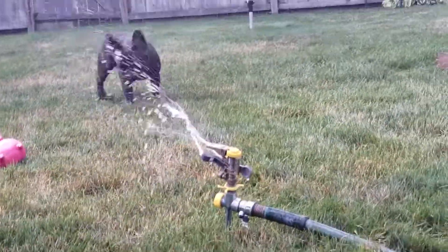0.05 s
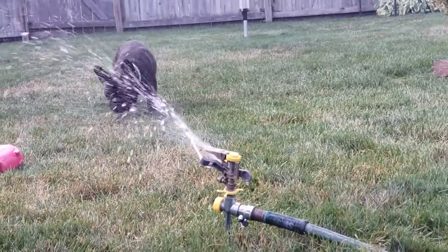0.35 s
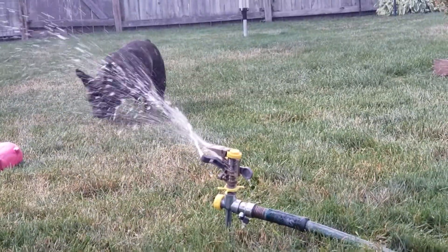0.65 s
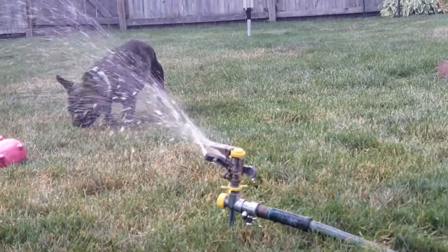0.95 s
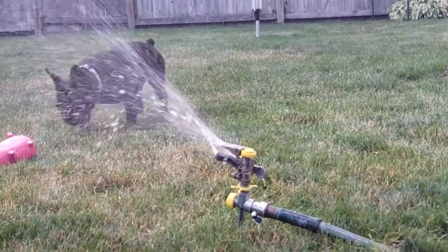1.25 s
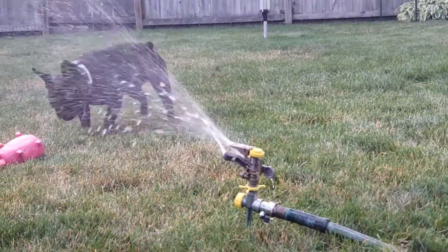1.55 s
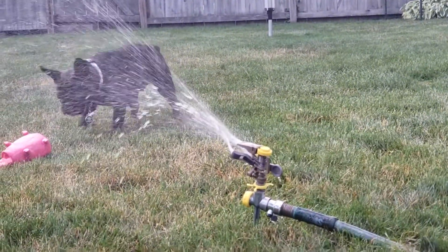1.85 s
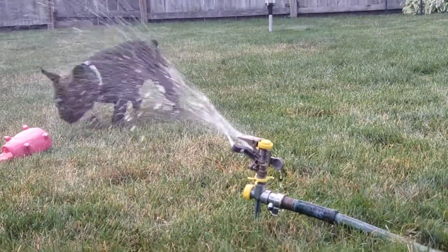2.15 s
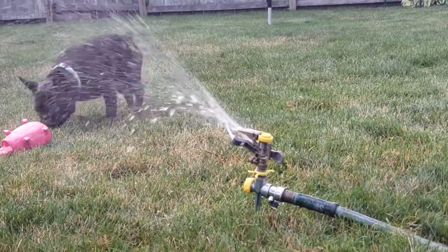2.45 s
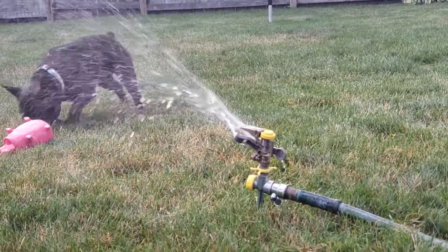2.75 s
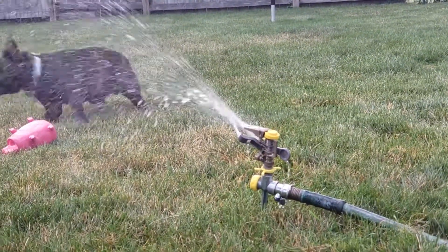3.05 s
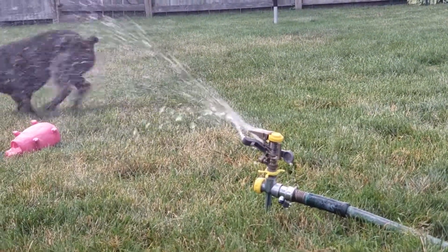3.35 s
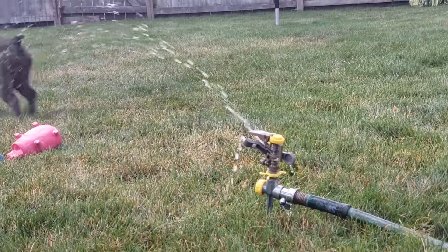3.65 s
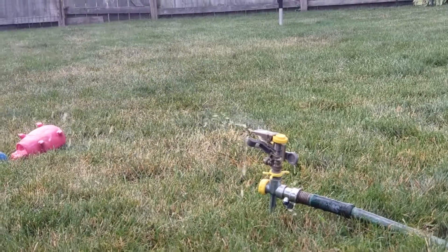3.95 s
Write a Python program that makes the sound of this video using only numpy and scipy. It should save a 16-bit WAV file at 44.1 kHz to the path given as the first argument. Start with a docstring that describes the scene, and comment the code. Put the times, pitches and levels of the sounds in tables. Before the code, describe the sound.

A lawn sprinkler hisses steadily, then clicks and splutters as the water dies away.

```python
"""Impact sprinkler on a lawn.

Close to a pair of microphones, the jet hisses steadily, drums on a dog's coat and rings in its muzzle.
After three seconds the spring arm starts to swing: it slaps through the jet, scatters drops and knocks
on the metal head, ever weaker as the water pressure dies. A low outdoor rumble lies underneath."""
import sys
import numpy as np
from scipy.fft import rfft, irfft, next_fast_len
from scipy.io import wavfile

SR = 44100
rng = np.random.default_rng(int(sys.argv[2]) if len(sys.argv) > 2 else 0)


def dump_mix(stems):
    """Bounce the given channels to the path in sys.argv[1] as a 16-bit WAV at rate SR."""
    frames = np.atleast_2d(stems).T  # one column per channel
    limited = np.clip(frames, -1, 1)  # hard clip at full scale
    pcm = np.round(limited * 32767).astype(np.int16)
    wavfile.write(sys.argv[1], SR, pcm)


N = 176400
T = np.arange(N) / SR
FFT_SIZE = next_fast_len(N + 8192, real=True)
HZ = np.fft.rfftfreq(FFT_SIZE, 1 / SR)


def amp(db):
    return np.exp(np.asarray(db) * (np.log(10) / 20))


def unit_rms(x):
    return x / np.sqrt(np.mean(x ** 2) + 1e-20)


def over_hz(points, hz=HZ):
    """Interpolate (Hz, value) points on a log frequency axis."""
    freqs, values = np.transpose(points)
    return np.interp(np.log(hz + 1), np.log(freqs + 1), values)


def over_time(rows):
    """One per-sample curve for each column after the time."""
    times, *columns = np.transpose(rows)
    return [np.interp(T, times, column) for column in columns]


def wobble(knots_per_s):
    """Random curve of rms near 1."""
    count = int(N * knots_per_s / SR) + 2
    return 1.2 * np.interp(T * knots_per_s, np.arange(count), rng.standard_normal(count))


def peak(centre_hz, half_width_hz, hz=HZ, power=2):
    return 1 / (1 + np.abs((hz - centre_hz) / half_width_hz) ** power)


def filtered(x, response):
    return irfft(rfft(x, FFT_SIZE) * response, FFT_SIZE)[..., :N]


def noise(colour, coherence):
    """Coloured stereo noise of rms 1 whose sides are partly alike."""
    angle = np.arccos(np.clip(coherence, -1, 1)) / 2
    mid, side = rng.standard_normal((2, 2 * len(HZ))).view(complex)
    mid, side = mid * np.cos(angle), side * np.sin(angle)
    return unit_rms(irfft(colour * np.array([mid + side, mid - side]), FFT_SIZE)[:, :N])


def lead_left(x, phase_rad=0, lead_ms=0):
    """The sound reaches the left microphone first, by a phase plus a time."""
    lead_rad = phase_rad + 2 * np.pi * HZ * lead_ms * 1e-3
    return filtered(x, np.exp(np.outer([0.5j, -0.5j], lead_rad)))


def blow(t60_s, attack_s=0.00033, hold_s=0.00036):
    """Impact envelope: quick rise, brief hold, decay."""
    t = T[:SR // 10]
    return (1 - np.exp(-t / attack_s)) * np.exp(-np.log(1000) * np.maximum(t - hold_s, 0) / t60_s)


def add(out, start_s, x):
    part = out[..., round(start_s * SR):][..., :x.shape[-1]]
    part += x[..., :part.shape[-1]]


# Hiss level. Each row: time in seconds, relative dB in each of five bands, low to high.
JET_LEVELS = [(0, -69, -59, -60, -57, -57), (0.25, -68, -57, -65, -55.5, -57.5),
              (0.5, -66.5, -54.5, -61, -57.5, -55), (0.8, -63, -53, -59.5, -54.5, -53.5),
              (1.0, -59, -50, -58, -51, -50.5), (1.25, -57.5, -48.5, -55, -53.5, -49.5),
              (1.6, -60, -50, -58, -53.5, -51.5), (1.95, -57.5, -49.5, -55, -55, -52),
              (2.3, -60.5, -51.5, -58, -53.5, -54), (2.65, -61, -51.5, -57.5, -53, -55.5),
              (3.0, -60, -52.5, -57, -54.5, -54.5)]
# Lower edge and gain of each band.
JET_EDGES_HZ = [700, 3600, 9000, 11200, 13200]
JET_GAINS_DB = [-2.4, -3.0, -3.7, -4.2, -2.6]
# Hiss spectrum. Each row: frequency in Hz, gain in dB.
JET_COLOUR = [(700, -19), (1150, -23.5), (1400, -21), (1750, -12), (2100, -12), (2700, -14), (3300, -17),
              (3950, -9), (4200, -9), (4650, -3.5), (4980, 2.2), (5250, -4), (5650, -5), (6200, -12),
              (6950, -12), (7500, -8.5), (8000, -11.5), (8450, -15.5), (8950, -15.5), (9700, -10),
              (10600, -11), (11200, -6), (12200, -2.5), (12900, -2.5), (13450, -7), (14700, -2.5),
              (15700, -2.5), (16000, -32)]
# Likeness of the sides. Each row: frequency in Hz, coherence from 0 to 1.
JET_COHERENCE = [(700, 0.2), (1200, 0.15), (1800, 0.68), (2400, 0.6), (3200, 0.2), (4000, 0.72),
                 (5600, 0.68), (6400, 0.2), (8500, 0.42), (10000, 0.68), (15500, 0.7)]
# Lead on the left. Each row: frequency in Hz, phase in radians.
JET_PHASE = [(500, 0.1), (1700, 1), (3000, 2), (3800, 6.3), (4500, 6.5), (5800, 8.1), (6300, 8.3),
             (7300, 13), (8800, 13.3), (9800, 14.4), (12000, 16), (13400, 19.4), (15000, 21.8), (16000, 22)]
# Dying pressure. Each row: time in seconds, drive in dB, of which each band follows a share.
PRESSURE = [(3.05, 7), (3.28, -3.5), (3.45, -18), (3.6, -12.5), (3.75, -28), (4, -30)]
SLIDE_MID_S, SLIDE_LENGTH_S = 1.07, 0.43  # the jet slides off the dog's face


def jet(dulling_per_band=0.11, drops_per_s=8.5, drop_decay_s=0.0015):
    """The jet hisses, fluttering as it breaks into drops and dulling as the pressure dies."""
    highpasses = [1 / (1 + (hz / (HZ + 1)) ** 30) for hz in JET_EDGES_HZ] + [0]
    pressure_db, = over_time(PRESSURE)
    flutter_db = 1.04 * wobble(70) + 0.34 * wobble(8.92)
    hiss = noise(amp(over_hz(JET_COLOUR)), over_hz(JET_COHERENCE))
    out = 0
    for k, level_db in enumerate(over_time(JET_LEVELS)):
        band = filtered(hiss, highpasses[k] - highpasses[k + 1])
        band = unit_rms(band * amp(0.92 * wobble(900)))
        drive_db = pressure_db * (0.5 + dulling_per_band * k)
        out += band * amp(level_db + JET_GAINS_DB[k] + flutter_db + drive_db)
    drops = rng.random(N) < drops_per_s / SR
    ticks = drops * amp(-56 + pressure_db + 3.9 * rng.standard_normal(N))
    out += hiss * np.convolve(ticks, np.exp(-T[:SR // 400] / drop_decay_s))[:N]
    slid = np.clip((T - SLIDE_MID_S) / SLIDE_LENGTH_S + 0.5, 0, 1)
    on_face = lead_left(out, over_hz(JET_PHASE), lead_ms=0.016)
    off_face = lead_left(out, over_hz(JET_PHASE))
    return (1 - slid) * on_face + slid * off_face


# Arm on head. Each row: start in seconds, relative dB in each of three crack bands,
# crack T60 in seconds, relative ring level in dB.
KNOCKS = [(3.058, -38, -17, -18, 0.009, -1), (3.0652, -28, -37, -27, 0.012, -4),
          (3.0808, -41, -48, -19, 0.014, -10), (3.0965, -37, -15, -9.5, 0.0091, -9),
          (3.1511, -39, -29, -19, 0.016, 3.5), (3.1548, -41, -31, -22.5, 0.008, -2),
          (3.2195, -32, -30, -16, 0.006, -8), (3.2215, -21, -14.5, -14, 0.015, -3.5),
          (3.259, -37, -42, -30, 0.011, -2), (3.3564, -26, -35, -16, 0.014, -1),
          (3.522, -30, -27, -20, 0.021, -0.5), (3.6124, -30, -41, -25.5, 0.012, 3),
          (3.7505, -35.5, -39, -25, 0.0069, 4), (3.8156, -43, -43, -29, 0.005, -1),
          (3.843, -58, -49, -40, 0.0064, -3), (3.8812, -62, -63, -48, 0.011, 0),
          (3.9634, -55, -42, -33.5, 0.0046, -1.5)]
# Centres of the crack bands.
CRACK_HZ = [5650, 8300, 13800]
# Metal head. Each row: frequency in Hz, nominal width in Hz, ring gain in dB, T60 in seconds,
# rattle gain in dB.
HEAD_MODES = [(5830, 90, -1.5, 0.041, -3), (7750, 180, 7, 0.045, 2.5), (10540, 250, -5, 0.028, -0.5),
              (13500, 180, -2.5, 0.019, 1), (14780, 190, 1.5, 0.03, 0), (15500, 210, -1, .025, 4)]
# Loose arm. Each row: time in seconds, relative level in dB.
RATTLE_LEVEL = [(3.04, -92.5), (3.1, -60), (3.19, -54.5), (3.3, -61.5), (3.6, -64), (3.68, -63),
                (3.8, -73.5), (3.89, -68), (3.95, -78), (4, -77)]


def knocks(crack_gain_db=-2.5, ring_gain_db=-9):
    """Each knock of the arm is a hard crack and a short, rough ring; in between, the head rattles."""
    out = 0
    contact_snap = amp(1) * blow(t60_s=0.00096)
    for k, hz in enumerate(CRACK_HZ):
        envelope = np.zeros(N)
        for start_s, *bands_db, t60_s, _ in KNOCKS:
            add(envelope, start_s, amp(bands_db[k] + crack_gain_db) * (blow(t60_s) + contact_snap))
        out += envelope * noise(peak(hz, 0.19 * hz, power=4), coherence=0.78)
    rattle = amp(over_time(RATTLE_LEVEL)[0]) * unit_rms(amp(1.5 * wobble(140)))
    for hz, width_hz, mode_db, t60_s, rattle_db in HEAD_MODES:
        envelope = amp(rattle_db) * rattle
        for start_s, *bands_db, _, ring_db in KNOCKS:
            strike_db = np.interp(hz, CRACK_HZ, bands_db)
            add(envelope, start_s, amp(strike_db + ring_db + ring_gain_db + mode_db) * blow(t60_s))
        out += envelope * noise(peak(hz, 0.68 * width_hz), coherence=0.17)
    return out


# Arm in the jet. Each row: start in seconds, relative level in dB, T60 in seconds, treble gain in dB,
# pitch in Hz.
SLAPS = [(3.087, -32, 0.032, 0, 3360), (3.128, -18.5, 0.011, 0, 5640), (3.1445, -24.5, 0.041, -1, 3360),
         (3.1549, -26, 0.051, 6, 5600), (3.1589, -25.5, 0.034, 10.5, 3460), (3.196, -34, 0.11, 6, 7600),
         (3.23, -29, 0.05, -3, 5700), (3.2922, -26, 0.051, -4, 4800), (3.2986, -12, 0.012, 3.5, 5400),
         (3.308, -20, 0.026, 4, 5170), (3.379, -36, .05, 9, 5900), (3.412, -43, 0.046, 6, 5760),
         (3.4505, -12.5, 0.017, -1.5, 4980), (3.463, -29.5, 0.039, 4.5, 4930),
         (3.489, -40, 0.029, 16, 5500), (3.527, -34, 0.062, 5, 3200), (3.6301, -17, 0.0091, 0, 4470),
         (3.643, -48, 0.14, 15, 5800), (3.7645, -53, 0.034, 3, 5800)]
# Slap spectrum. Each row: frequency in Hz, gain in dB.
SLAP_COLOUR = [(300, -25), (1300, -24.5), (1900, -24.5), (2500, -7), (2950, -12.5), (3500, -9),
               (4400, -0.5), (5300, -2.5), (6500, 4), (8500, -10), (12000, -5.5), (15600, -0.5),
               (16300, -41)]


def slaps(hollow_db=11.5, half_width_hz=390):
    """The arm cuts into the jet: short, grainy smacks of water, each with its own hollow pitch."""
    out, n = np.zeros((2, N)), SR // 10
    hz = np.fft.rfftfreq(n, 1 / SR)
    for start_s, level_db, t60_s, treble_db, pitch_hz in SLAPS:
        colour = amp(over_hz(SLAP_COLOUR, hz) + hollow_db * peak(pitch_hz, half_width_hz, hz))
        treble_shelf = amp(treble_db / (1 + (8500 / (hz + 1)) ** 6))
        white = unit_rms(rng.standard_normal(n) + 1.3 * rng.standard_normal((2, n)))
        water = irfft(rfft(white) * unit_rms(colour) * treble_shelf, n)
        add(out, start_s, amp(level_db - 3) * blow(t60_s) * water)
    grain = amp(1.3 * wobble(1500))
    return out * grain


# Splatter level. Each row: time in seconds, level in dB.
SPLATTER_LEVEL = [(3.0, -100), (3.07, -50), (3.19, -44), (3.27, -54), (3.35, -55), (3.41, -50),
                  (3.5, -49.5), (3.6, -59), (3.72, -63), (4, -70)]
# Splatter spectrum. Each row: frequency in Hz, gain in dB.
SPLATTER_COLOUR = [(700, -20), (1350, -14), (1800, -14), (2400, -7), (3800, -2), (5500, 3.5), (7500, 0),
                   (10000, -6), (12200, -8), (14500, 0.5), (15700, -4), (16200, -25)]


def splatter(drops_per_s=700, scatter_db=3, drop_decay_s=0.0008):
    """Torn water keeps crackling between the arm's slaps."""
    drops = (rng.random(N) < drops_per_s / SR) * amp(scatter_db * rng.standard_normal(N))
    crackle = unit_rms(np.convolve(drops, np.exp(-T[:SR // 200] / drop_decay_s))[:N])
    level_db, = over_time(SPLATTER_LEVEL)
    return amp(level_db) * crackle * noise(amp(over_hz(SPLATTER_COLOUR)), coherence=0.74)


# Spray spectrum. Each row: frequency in Hz, gain in dB.
SPRAY_COLOUR = [(1000, 1), (2600, 5), (4000, 0), (6000, -4), (9000, -3), (12000, -2), (16000, -10)]


def spray(blows, gain_db=-12, t60_s=0.2, rise_s=0.0039):
    """Scattered drops patter after the blows."""
    t = T[:SR // 3]
    envelope = np.exp(-np.log(1000) * t / t60_s) * (1 - np.exp(-t / rise_s))
    tail = rng.standard_normal((2, len(t))) * envelope
    tail /= np.linalg.norm(tail[0])
    patter = amp(3.8 * wobble(250))
    return patter * filtered(blows, amp(gain_db + over_hz(SPRAY_COLOUR)) * rfft(tail, FFT_SIZE))


# Jet on the dog. Each row: centre in seconds, level in dB, sigma in seconds, pitch in Hz,
# hollowness in dB.
DRUMS = [(1.295, -60, 0.028, 645, 10), (1.96, -61, 0.055, 570, 6), (2.431, -55.5, 0.0012, 1000, 8),
         (3.15, -62, 0.022, 1180, 9), (3.308, -62, 0.006, 1150, 5)]
# Coat spectrum. Each row: frequency in Hz, gain in dB.
COAT_COLOUR = [(200, -2), (450, 4), (640, 6), (820, -4), (1150, -1), (2000, -12), (4000, -40)]


def drumming(half_width_hz=74):
    """Dull swells where water strikes the dog, each with its own hollow pitch."""
    out = 0
    for centre_s, level_db, sigma_s, pitch_hz, hollow_db in DRUMS:
        colour = amp(over_hz(COAT_COLOUR) + hollow_db * peak(pitch_hz, half_width_hz))
        swell = np.exp(-0.5 * ((T - centre_s) / sigma_s) ** 2)
        out += amp(level_db) * swell * noise(colour, coherence=1)
    return out


# Muzzle resonances. Each row: frequency in Hz, half-width in Hz, level in dB.
MUZZLE_MODES = [(1740, 190, -72), (7570, 460, -64.5), (940, 250, -77.5)]


def muzzle(fade_s=0.46):
    """Water rings in the hollow of the dog's muzzle until the jet slides off."""
    fade = np.clip((SLIDE_MID_S - T) / fade_s, 0, 1)
    return fade * sum(amp(level_db) * noise(peak(hz, half_width_hz), coherence=0.16)
                      for hz, half_width_hz, level_db in MUZZLE_MODES)


# Rumble level. Each row: time in seconds, relative level in dB.
RUMBLE_LEVEL = [(0, -52), (.6, -52), (1.3, -50.5), (1.8, -52.5), (2.2, -50.5), (3, -52), (4, -56.5)]
# Rumble and air spectra. Each row: frequency in Hz, gain in dB.
RUMBLE_COLOUR = [(12, -21), (20, -41), (40, -6.5), (64, 2), (92, -8), (121, -4), (172, -13.5), (248, -17),
                 (310, -25), (346, -20.5), (387, -28), (644, -28), (743, -35), (900, -61), (1170, -73),
                 (1980, -120)]
AIR_COLOUR = [(100, -5), (400, 3), (900, 1), (1350, 2), (1900, -11), (3000, -18), (8000, -25)]


def rumble(air_db=-77):
    """Low outdoor rumble, nearly the same on both sides, and faint air above it."""
    level_db, = over_time(RUMBLE_LEVEL)
    low = noise(amp(over_hz(RUMBLE_COLOUR)), coherence=over_hz([(120, 0.93), (300, 0.77), (700, 0.36)]))
    air = noise(amp(over_hz(AIR_COLOUR)), coherence=0.044)
    return amp(level_db + 1.08) * low + amp(air_db) * air


def scene():
    """Jet, arm, spray, dog and yard together."""
    arm = lead_left(knocks() + slaps() + splatter(), lead_ms=0.3645)
    return jet() + muzzle() + arm + spray(arm) + drumming() + rumble()


# Microphone ports. Each row: frequency in Hz, left level above right in dB.
PORT_BALANCE = [(100, 0.6), (500, 2.5), (1200, -1.5), (2200, -3), (3000, 6), (3600, -1), (4100, -1.5),
                (4900, -7.5), (5500, -4.5), (6100, -5.5), (7200, 14), (8100, 11.5), (8900, 6), (10000, 3.5),
                (11000, 0), (13000, 2), (14000, 1), (15000, -4), (16000, -4)]


def record(dry, cutoff_hz=16100):
    """Each microphone port has its own colour; a steep low-pass limits the band."""
    ports = amp(np.outer([0.5, -0.5], over_hz(PORT_BALANCE)))
    ports /= np.sqrt(np.mean(ports ** 2, axis=0))
    return filtered(dry, ports / (1 + (HZ / cutoff_hz) ** 120))


dry = scene()
out = record(dry)
dump_mix(out)
```